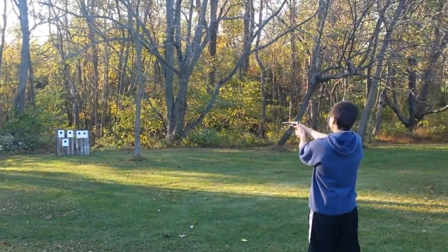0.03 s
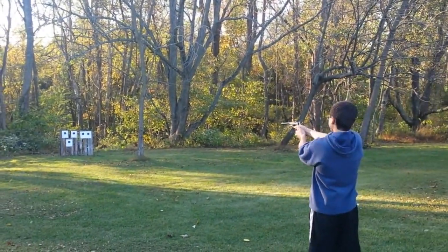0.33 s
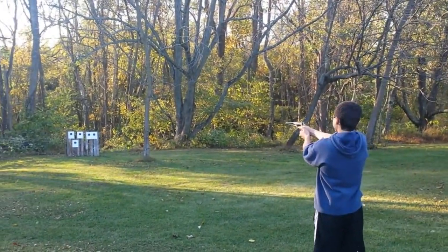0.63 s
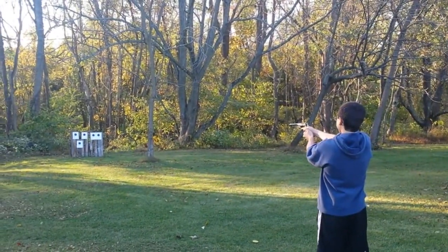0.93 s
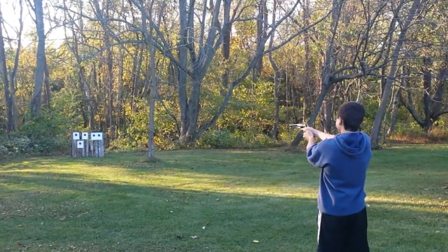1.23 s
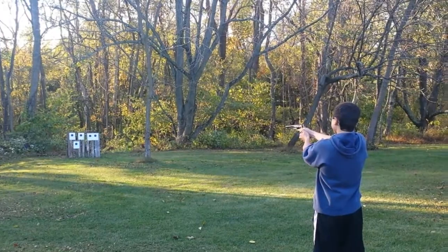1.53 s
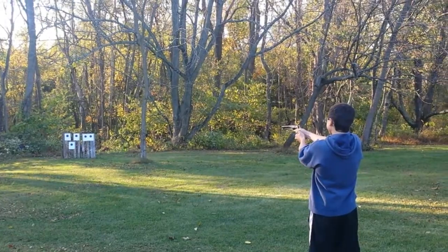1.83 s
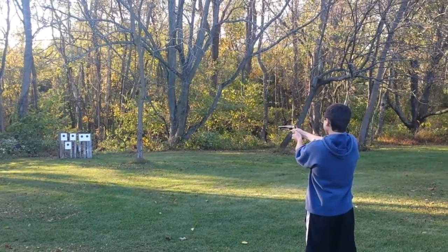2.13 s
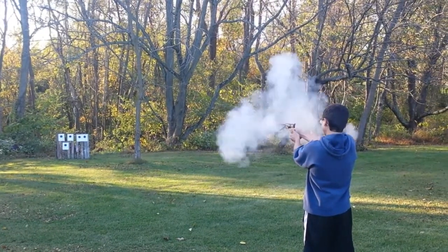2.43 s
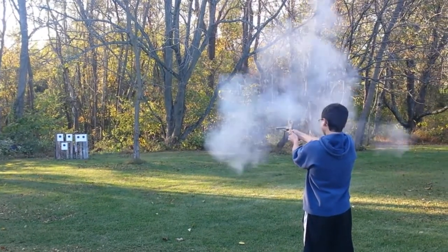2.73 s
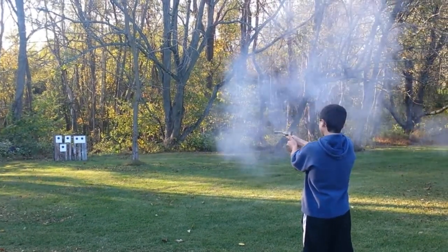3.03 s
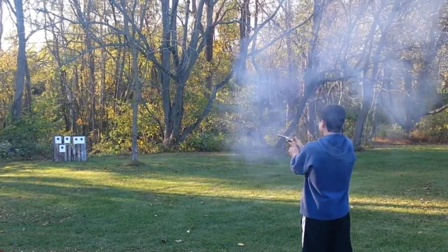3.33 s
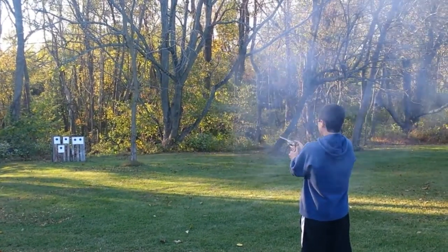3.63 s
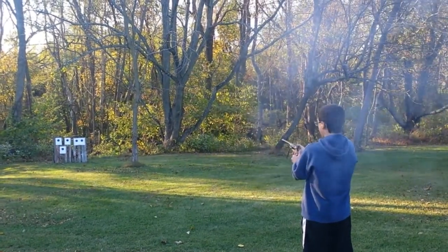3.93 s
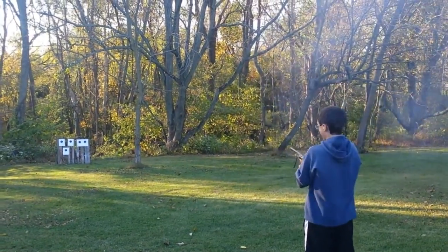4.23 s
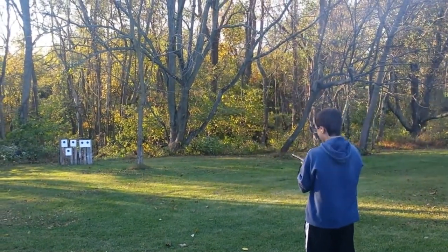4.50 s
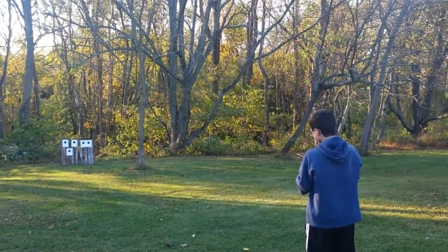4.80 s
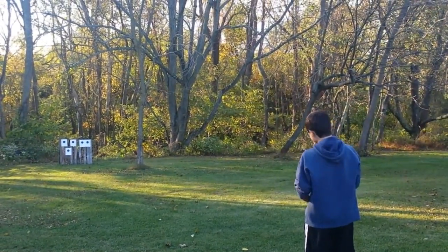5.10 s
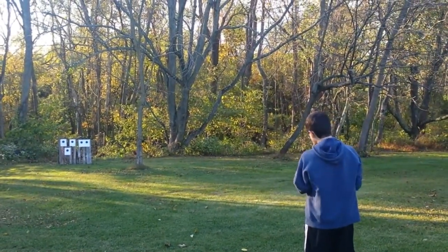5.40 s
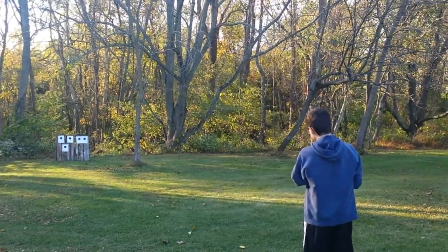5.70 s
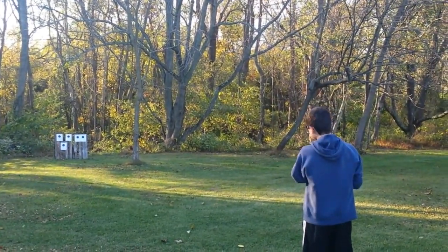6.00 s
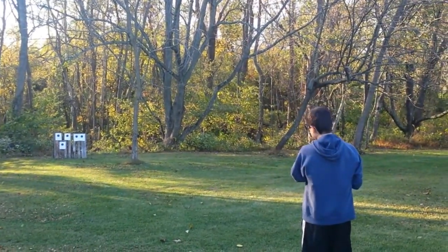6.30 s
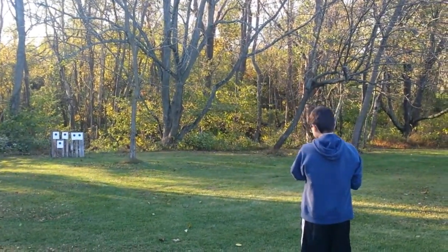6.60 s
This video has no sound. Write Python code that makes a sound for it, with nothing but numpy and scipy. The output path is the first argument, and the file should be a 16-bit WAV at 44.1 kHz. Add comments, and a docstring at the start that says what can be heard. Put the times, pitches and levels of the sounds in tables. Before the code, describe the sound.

One very loud black powder pistol shot cracks outdoors and echoes through trees, over a steady camera motor hum and light wind.

```python
"""A pistol shot beside a wood

One black powder shot on a lawn is heard from a camera a few metres behind the shooter. Its pressure
fronts overload the microphones, trunks scatter them back as a rolling tail, and far echoes return.
The camera's drive motor hums and rings the housing throughout, a light breeze buffets the microphone
ports, and a small tick comes late. The gain control ducks after the shot and slowly recovers."""
import sys
import numpy as np
from scipy import signal
from scipy.fft import rfft, irfft
from scipy.io import wavfile
from scipy.ndimage import uniform_filter1d

SR = 44100
rng = np.random.default_rng(int(sys.argv[2]) if len(sys.argv) > 2 else 0)


def int16_out(signal):
    """Quantize to a 16-bit WAV file."""
    q = np.round(np.clip(np.atleast_2d(signal).T, -1, 1) * 32767)
    wavfile.write(sys.argv[1], SR, q.astype(np.int16))


N = 297675
T = np.arange(N) / SR
FREQS = np.maximum(np.arange(N // 2 + 1) * SR / N, 1)
SHOT_S, ROTOR_HZ, TOP_HZ = 2.3688, 193.08, 15300

# near-harmonic partials of the motor: (multiple of the rotor frequency, left [dB], right [dB])
MOTOR_ORDERS = [(1.957, -62, -59), (3.001, -28.5, -30), (4.996, -47.5, -46.5), (5.92, -67, -54.5),
                (10, -58.5, -82.5), (10.97, -56.5, -70.5), (12.11, -56, -85.5), (13.02, -52.5, -55),
                (15.07, -63, -64.5), (16.08, -61, -57), (18, -53, -64.5), (21.3, -68.5, -68),
                (22, -62.5, -57.5), (23.18, -58, -78), (24.33, -54, -63.5), (28.7, -69, -70),
                (29.3, -96, -76.5), (32.1, -61, -68), (32.9, -53, -64), (35.21, -48, -68)]
# weaker tones of the mechanism: (frequency [Hz], level [dB])
GEAR_TONES = [(446.8, -55.5), (479.1, -51.5), (500.6, -43), (522.2, -60.5), (638.5, -53.5), (1089, -60.5),
              (4385, -60), (4414, -55.5)]
# gain on all gear tones: (time [s], gain [dB])
GEAR_GAIN = [(0, -2), (1.4, -2.5), (2.2, 2.5), (6.75, 2)]
# filter on the whir through the housing: (frequency [Hz], relative left [dB], relative right [dB])
WHIR_RESPONSE = [(368, -74, -73.5), (447, -68.5, -66.5), (616, -70, -66.5), (780, -76.5, -72),
                 (1114, -65, -74.5), (1200, -71.5, -76), (2940, -71.5, -78.5), (3850, -79.5, -83),
                 (4210, -75.5, -79.5), (5330, -75, -80), (6220, -68.5, -85.5), (7600, -78, -82),
                 (11880, -107, -92.5), (12400, -120, -105)]
# narrow housing resonances: (frequency [Hz], nominal width [Hz], left [dB], right [dB])
HOUSING_MODES = [(4436, 63, -47, -56), (6323, 81, -44, -53), (3072, 51, -55.5, -54), (2541, 59, -54.5, -64)]
# gusts that swell and die: (time of the height [s], length [s], level [dB])
GUSTS = [(0.196, 0.36, -42), (0.885, .12, -41.5), (1.2, .1, -42.5), (4.3, 0.25, -52), (4.813, 0.072, -46),
         (5.79, .12, -43), (6.012, 0.28, -42), (6.22, .09, -39), (6.388, 0.11, -39), (6.61, 0.2, -41.5)]
# puffs of air on the ports: (time [s], peak [dB], frequency [Hz], left minus right [dB])
PUFFS = [(0.789, -35, 90, 14), (1.262, -35.5, 120, 21), (4.02, -30.5, 118, 27), (4.074, -34, 110, 26),
         (4.80, -39, 115, 0), (5.986, -28.5, 95, 10), (6.008, -31, 70, 14)]
# pressure fronts of the shot and its near reflections:
# (time [s], level [dB], overpressure duration [ms], gas relative to the front [dB], gas decay [ms])
FRONTS = [(2.3695, 15, .25, 3, 1.34), (2.3745, 13.5, 0.68, 10, 2.6), (2.378, 7, 2.4, -8, 9.0),
          (2.3912, 5, .8, 5.5, 5.4), (2.395, 11.5, 0.73, -8.5, 3.0)]
# spectrum of the turbulent gas: (frequency [Hz], relative level [dB])
GAS_SPECTRUM = [(60, -10.5), (210, 4.5), (420, -4.5), (700, 3.5), (1100, -8), (2000, -2), (3500, -10),
                (6500, -13), (10000, -18.5), (15000, -18)]
# scatter from the lawn and the nearest trees: (frequency [Hz], relative level [dB])
NEAR_SPECTRUM = [(40, -14.5), (120, -13.5), (250, 5.5), (420, -1.5), (800, -3), (1800, -5.5), (3200, -9),
                 (6500, 0), (9000, -6.5), (15000, -18)]
# scatter from the depth of the wood: (frequency [Hz], relative level [dB])
WOOD_SPECTRUM = [(40, -22.5), (130, 0), (190, 2.5), (280, -8), (440, 2.5), (720, 2.5), (1200, 1.5),
                 (1900, 2), (2800, 0.5), (3700, -4), (6000, 1.5), (9000, -8), (13000, -37)]
# echoes from big trunks and far walls, and one short high tick near 2.983 s: # (time [s], peak [dB], frequency
# [Hz], swell [cycles], left minus right [dB])
ECHOES = [(2.4277, 12, 2800, 0.51, 3), (2.468, 1, 1700, 1.2, 2), (2.487, 2, 1110, 0.72, 5),
          (2.496, 8, 730, 1.05, 1), (2.492, -1, 141, 0.58, -1), (2.585, 6.5, 800, 1.3, 3),
          (2.615, 2, 825, 1.8, 0), (2.644, 2, 720, 1.3, -2), (2.660, -0.5, 650, 1.5, 6),
          (2.665, -10, 170, 0.51, 1), (2.715, -6, 580, 1.2, 2), (2.781, -8, 840, 1.3, 10),
          (2.910, -15, 680, 1.3, 3), (2.9826, -6.5, 756, 1.2, 7), (2.983, -18, 3180, 1.1, 0),
          (2.985, -16.5, 128, 0.5, 1)]
# the two impulses of a tick in the camera: (time [s], relative peak [dB])
TICKS = [(6.3966, -22), (6.3996, -21)]


def undb(db):
    """Amplitude ratio: tenfold for every 20 dB."""
    return 10 ** (np.asarray(db) / 20)


def unit(x):
    """Normalisation of each channel to rms 1."""
    return x / np.sqrt(np.mean(x ** 2, axis=-1, keepdims=True))


def curve(rows):
    """Linear interpolation in time between (time, value) rows."""
    return np.interp(T, *np.transpose(rows))


def pan(db):
    """Direction by level difference: gains that put left db above right."""
    return undb(np.array([[db], [-db]]) / 2)


def noise(coherence=0):
    """Partial coherence: two white noises share this fraction of their power."""
    shared = np.sqrt(coherence) * rng.standard_normal(N)
    return shared + np.sqrt(1 - coherence) * rng.standard_normal((2, N))


def colour(x, points):
    """Minimum-phase filtering through (frequency [Hz], gain [dB]) points."""
    hz, db = np.transpose(points)
    gain = undb(np.interp(np.log(FREQS), np.log(hz), db))
    cepstrum = irfft(np.log(gain), N)
    causal_fold = 1 + np.sign(N / 2 - np.arange(N)) * (T > 0)
    return irfft(rfft(x) * np.exp(rfft(cepstrum * causal_fold)), N)


def band(x, hz, width):
    """Two-pole resonance with gain 1 at its centre."""
    return signal.lfilter(*signal.iirpeak(hz, hz / width, fs=SR), x)


def walk(rate):
    """Random modulation: steps drawn rate times a second, smoothed, at rms 1."""
    size = int(SR / rate)
    steps = rng.standard_normal(N)[np.arange(N) // size]
    return unit(uniform_filter1d(uniform_filter1d(steps, size), size))


def fade(start, ms):
    """Exponential decay after a sudden onset."""
    return (T >= start) * np.exp(-np.clip((T - start) * 1000 / ms, 0, 60))


def wavelet(start, hz, swell):
    """A damped oscillation of peak 1 whose envelope rises for swell cycles, then dies."""
    cycles = np.clip((T - start) * hz, 0, 20)
    wave = cycles * np.exp(-cycles / swell) * np.sin(2 * np.pi * cycles)
    return wave / np.abs(wave).max()


def motor():
    """Periodic forcing: a fluttering rotor gives near-harmonic partials, with gear tones beside them."""
    phase = 2 * np.pi * np.cumsum(ROTOR_HZ * (1 + 0.001207 * walk(45))) / SR
    throb_db = 0.58 * np.sin(2 * np.pi * 30 * T) + .5 * walk(18)
    hum = sum(undb([[left], [right]]) * np.sin(order * phase + 2 * np.pi * rng.random())
              for order, left, right in MOTOR_ORDERS)
    gears = sum(undb(db + 2.0 * walk(9)) * np.sin(2 * np.pi * hz * T + .5 * walk(7))
                for hz, db in GEAR_TONES)
    return np.sqrt(2) * (hum * undb(throb_db) + gears * undb(curve(GEAR_GAIN)))


def whir():
    """Forced resonance: running noise rings the housing and reaches each port with its own colour."""
    # long waves reach both ports alike, short ones differ
    common = colour(noise(0.93), [(100, -18), (330, 3), (900, -1.5), (2500, -8.5), (8000, -11)])
    apart = colour(noise(), [(200, -18), (700, -13.5), (1500, -5.5), (5000, 0)])
    hiss = np.array([colour(port, np.array(WHIR_RESPONSE)[:, [0, k + 1]])
                     for k, port in enumerate(common + apart)])
    rings = 0
    for hz, width, left, right in HOUSING_MODES:
        mode = band(band(noise(0.52), hz, 2.05 * width), hz, 2.05 * width)
        rings += undb([[left], [right]]) * unit(mode)
    return (undb(42) * hiss + rings) * undb(.5 * walk(40))


def breeze():
    """Turbulent pressure at the ports: a low rumble that swells in gusts, with a few distinct puffs."""
    spectrum = [(10, -35), (25, -15), (70, -2.5), (120, -2),
                (200, -8), (300, -26), (700, -44.5), (3000, -72)]
    rumble = unit(colour(noise(0.76) * undb(2.46 * walk(22)), spectrum))
    lull = undb(-47 + walk(6))
    gusts = sum(undb(db) * np.exp(-(2 * (T - s) / length) ** 2) for s, length, db in GUSTS)
    puffs = sum(undb(db) * pan(pan_db) * wavelet(s, hz, swell=0.37) for s, db, hz, pan_db in PUFFS)
    return rumble * np.hypot(lull, gusts) * pan(3.3) + puffs


def blast():
    """Blast waves: each front jumps in pressure, falls into suction and trails a roar of turbulent gas."""
    pressure, gas_envelope = 0, 0
    for s, db, push_ms, gas_db, gas_ms in FRONTS:
        age_ms = (T - s) * 1000
        pressure += undb(db) * (1 - age_ms / push_ms) * fade(s, push_ms)
        gas_envelope += undb(db + gas_db) * fade(s, gas_ms)
    roar = gas_envelope * unit(colour(noise(0.37), GAS_SPECTRUM))
    # the first front carries a hard crack; the swelling gas cloud then gives a punch and a deep boom
    crack = undb(12) * wavelet(SHOT_S, hz=2390, swell=1.05) * pan(5.3)
    punch = undb(7) * wavelet(SHOT_S + 0.00583, hz=254, swell=0.49) * pan(-10)
    boom = undb(4.5) * wavelet(SHOT_S + 0.0076, hz=93, swell=0.39)
    return pressure + crack + punch + boom + roar


def scatter(spectrum, per_s, spread_db, diffuse_db):
    """Scattering: small uneven reflections, each with its own lag between the ports, over diffuse noise."""
    chance, bearing = rng.random((2, N))
    arrivals = np.flatnonzero(chance < per_s / SR)
    sizes = rng.standard_normal(N)[arrivals] * undb(spread_db * rng.standard_normal(N)[arrivals])
    lag_samples = np.round(26 * (bearing[arrivals] - .5)).astype(int)
    left = np.bincount(arrivals, sizes, N)
    right = np.bincount((arrivals + lag_samples) % N, sizes, N)
    field = unit(np.array([left, right])) + undb(diffuse_db) * noise()
    return unit(colour(field, spectrum))


def absorb(x, start, db_per_khz_s):
    """Absorption: air and leaves take more treble the longer the sound has travelled."""
    hz, s, frames = signal.stft(x, SR, nperseg=256)
    loss_db = db_per_khz_s * np.outer(hz / 1000, np.maximum(s - start, 0))
    return signal.istft(frames * undb(-loss_db), SR)[1][:, :N]


def roll(loss_db_per_s):
    """Spreading and attenuation: the wood's return builds, holds, then falls with distance travelled."""
    delay_s, attack_s, fall_from_s = 0.053, 0.022, .17
    age = np.maximum(T - SHOT_S, 0)
    attack = 1 - np.exp(-np.maximum(age - delay_s, 0) / attack_s)
    travel_s = np.maximum(age, fall_from_s)
    spreading_db = 28 * np.log10(travel_s / fall_from_s)
    return attack * undb(-spreading_db - loss_db_per_s * (travel_s - fall_from_s))


def tail():
    """Reverberation: near scatter dies fast; the wood answers later and grows duller with distance."""
    near = scatter(NEAR_SPECTRUM, per_s=3000, spread_db=1.8, diffuse_db=-1)
    near = absorb(near, SHOT_S, db_per_khz_s=8) * fade(SHOT_S + 0.015, ms=69) * undb(8.5)
    wood = scatter(WOOD_SPECTRUM, per_s=1500, spread_db=1.6, diffuse_db=1.5)
    wood = absorb(wood, 2.233, db_per_khz_s=4.25) * roll(loss_db_per_s=19) * undb(4)
    # the ground carries a hollow, rolling band farthest; it is equally strong at both ports
    hollow = unit(band(band(noise(0.68), 673, 400), 673, 400))
    hollow *= undb(-6 + 2.0 * walk(70)) * roll(loss_db_per_s=11.5)
    return near * pan(4.0) + wood * pan(3.6) + hollow


def echoes():
    """Reflection: big trunks and far walls give single returns, narrowed by the grass to a few cycles; a short
    high tick sounds among them."""
    return sum(undb(db) * pan(pan_db) * wavelet(s, hz, swell) for s, db, hz, swell, pan_db in ECHOES)


def tick():
    """Impulse response: a plastic tick rings one high mode near the left port and rustles briefly."""
    ring = sum(undb(db - 6) * wavelet(s, hz=6920, swell=4) for s, db in TICKS)
    start = TICKS[0][0]
    rustle_envelope = undb(-35) * fade(start, ms=3) + undb(-43) * fade(start, ms=20)
    return ring * pan(13) + band(rustle_envelope * noise(), hz=11500, width=7000)


def scene():
    """Superposition: the shot and its returns add to the camera's own sounds and the breeze."""
    return blast() + tail() + echoes() + motor() + whir() + tick() + breeze()


def gain_control(x, overload_db, depth_db, attack_s, hold_s, release_s):
    """Automatic gain control: an overload pulls the gain down; it holds, then creeps back."""
    overloaded = np.abs(x).max(axis=0) > undb(overload_db)
    since_overload_s = T - np.maximum.accumulate(np.where(overloaded, T, -N))
    target = np.exp(-(np.maximum(since_overload_s - hold_s, 0) / release_s) ** 2)
    pole = np.exp(-1 / (attack_s * SR))
    duck = signal.lfilter([1 - pole], [1, -pole], target)
    return x * undb(-depth_db * duck)


def record(dry):
    """Saturation: after the gain control the input stage flattens the peaks; a low-pass cuts the top."""
    ducked = gain_control(dry, overload_db=20, depth_db=17.5, attack_s=.015, hold_s=.81, release_s=.5)
    clipped = ducked / (1 + ducked ** 6) ** (1 / 6)
    low_pass = signal.ellip(8, .2, 70, TOP_HZ, fs=SR, output="sos")
    return signal.sosfilt(low_pass, .95 * clipped)


dry = scene()
out = record(dry)
int16_out(out)
```